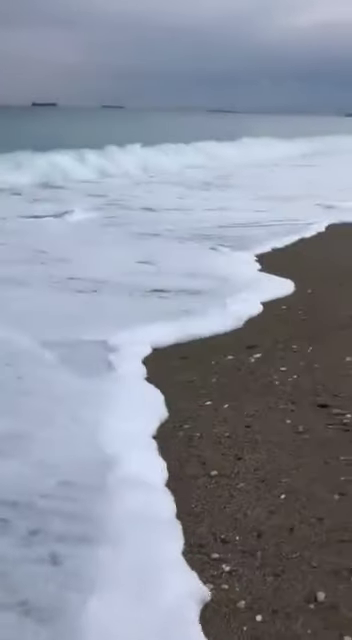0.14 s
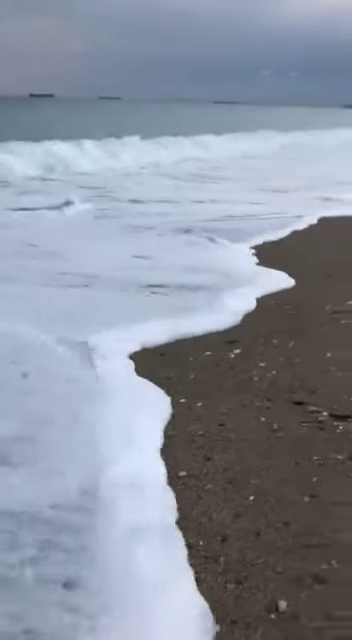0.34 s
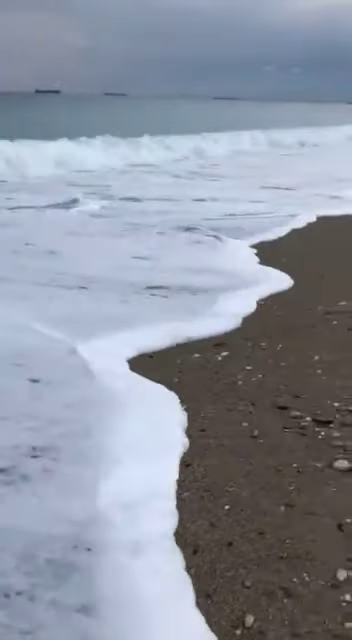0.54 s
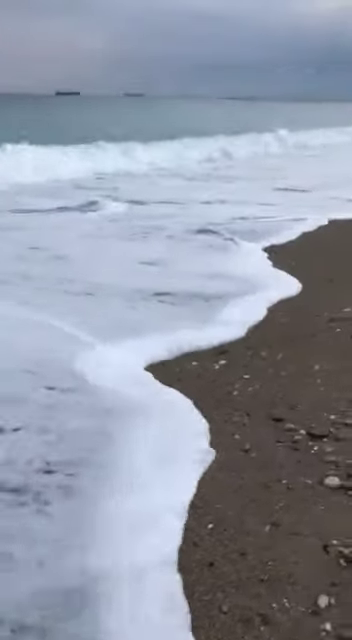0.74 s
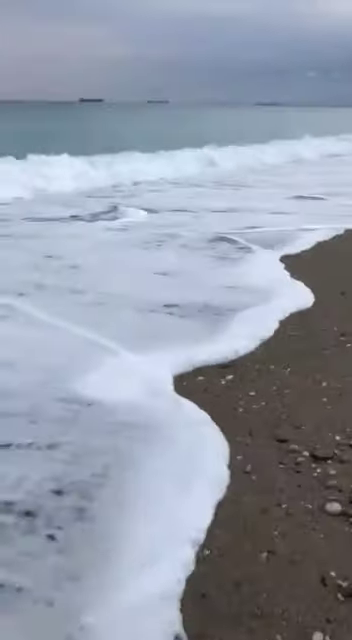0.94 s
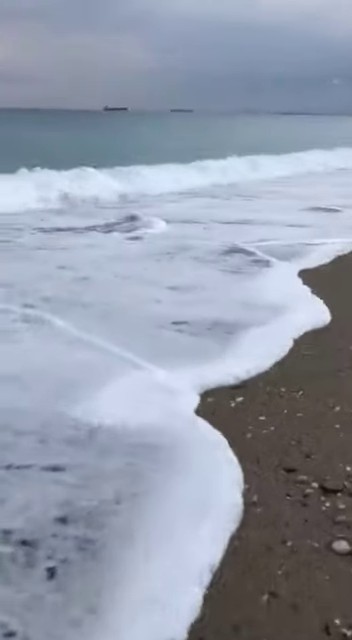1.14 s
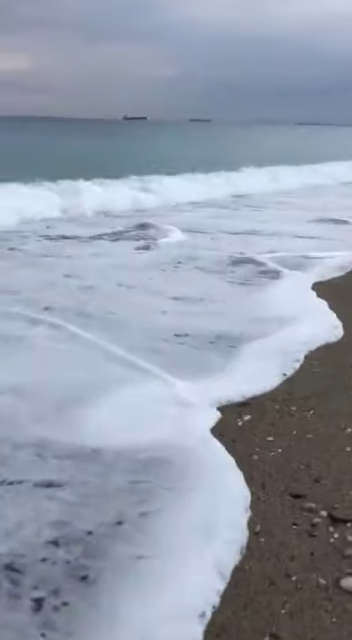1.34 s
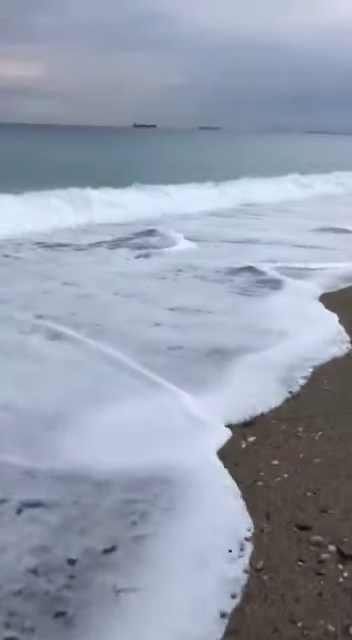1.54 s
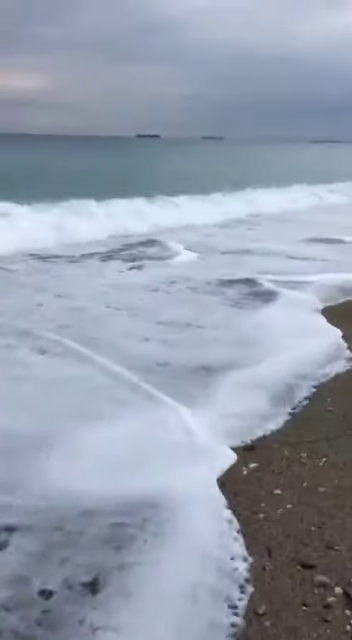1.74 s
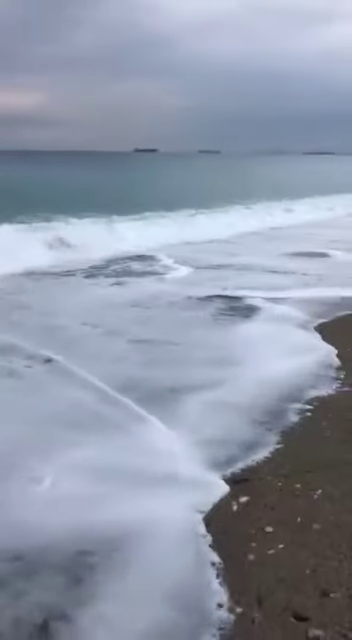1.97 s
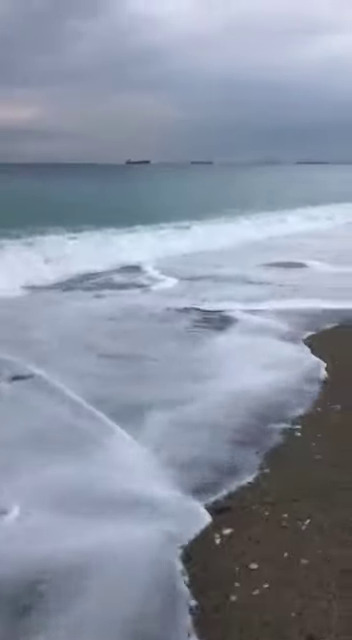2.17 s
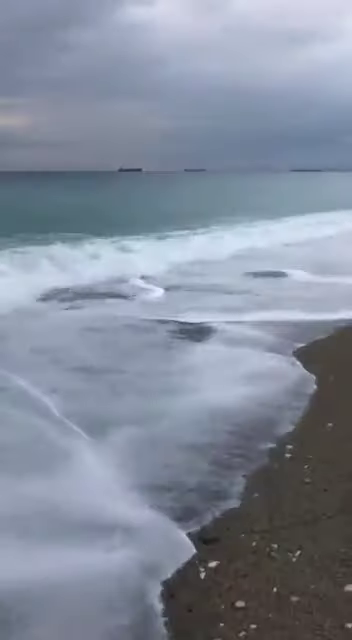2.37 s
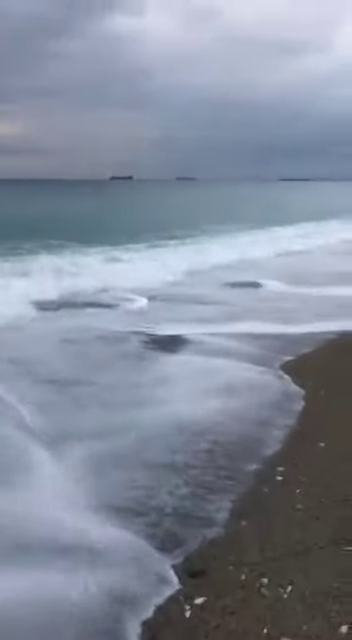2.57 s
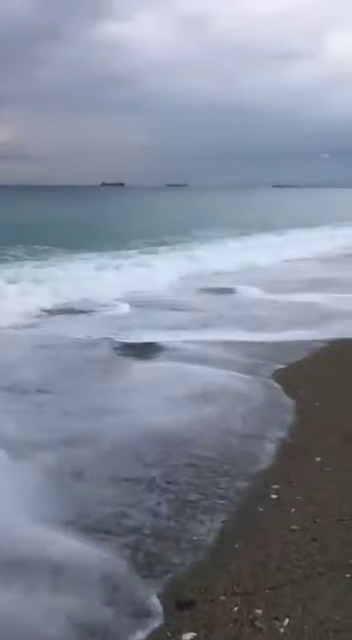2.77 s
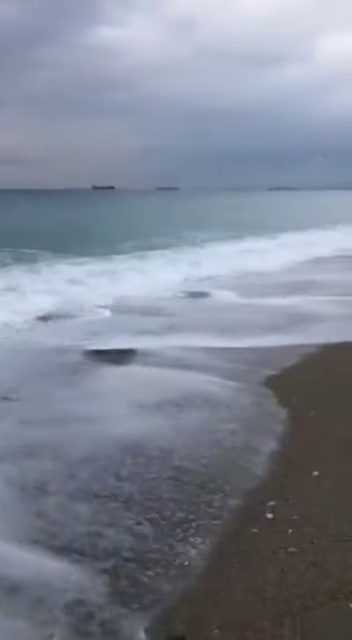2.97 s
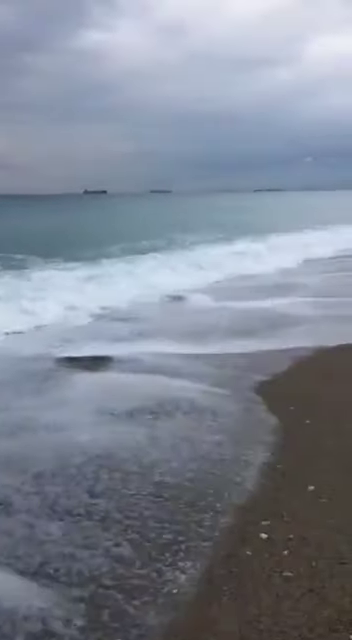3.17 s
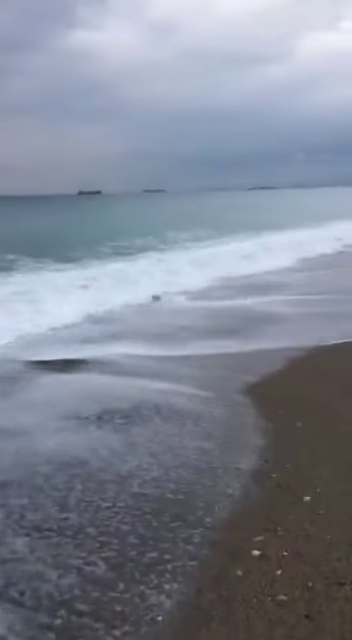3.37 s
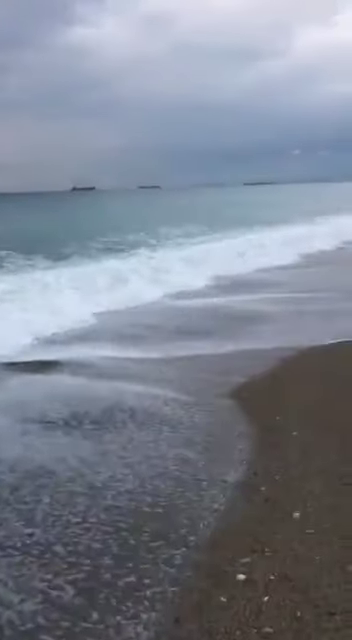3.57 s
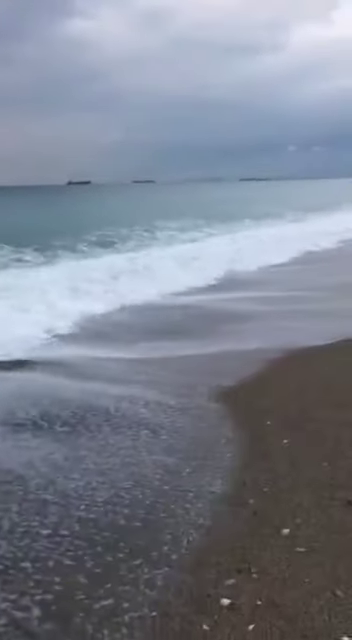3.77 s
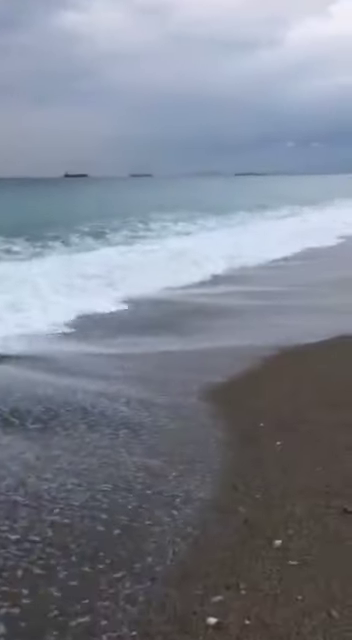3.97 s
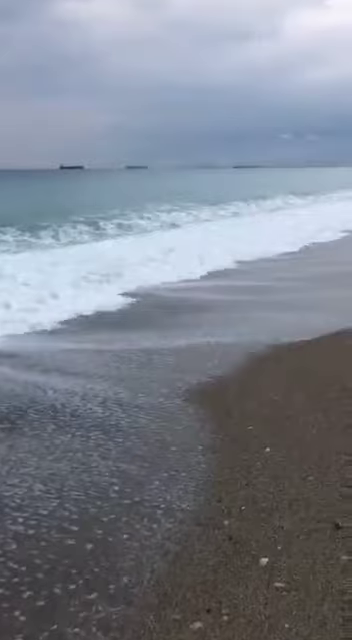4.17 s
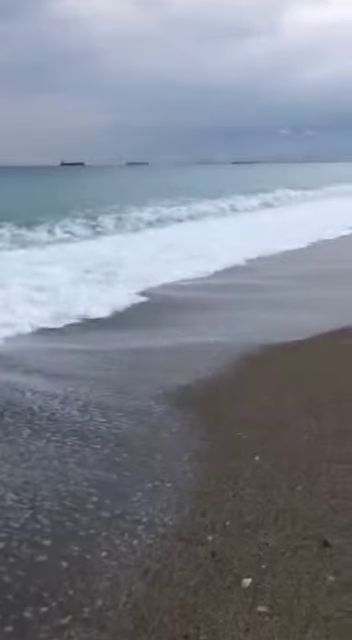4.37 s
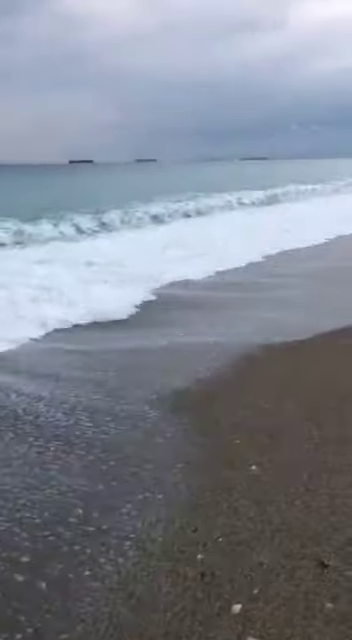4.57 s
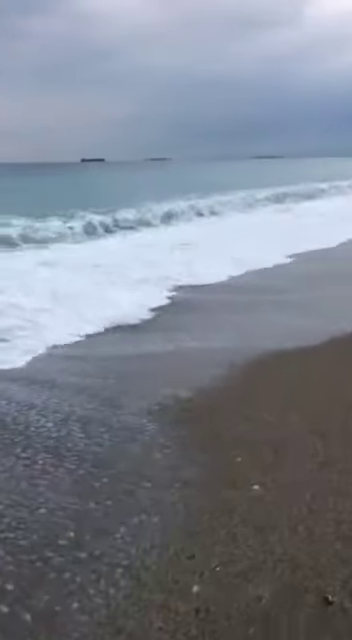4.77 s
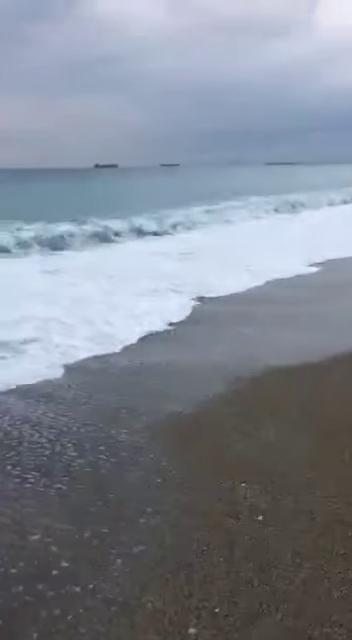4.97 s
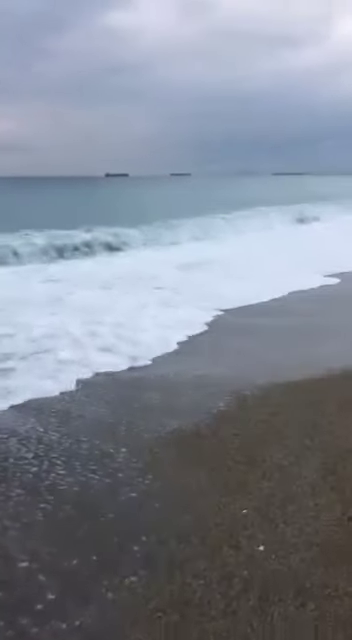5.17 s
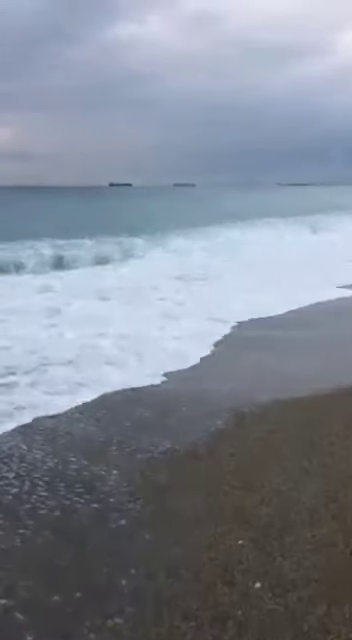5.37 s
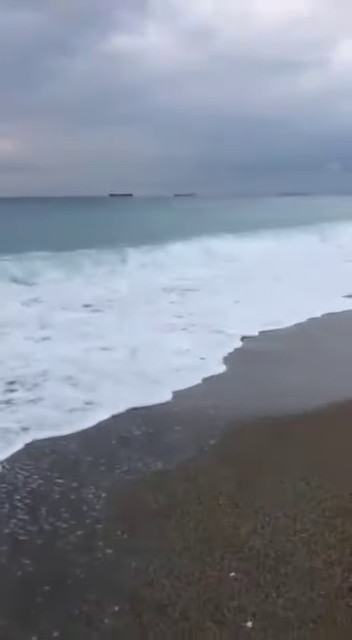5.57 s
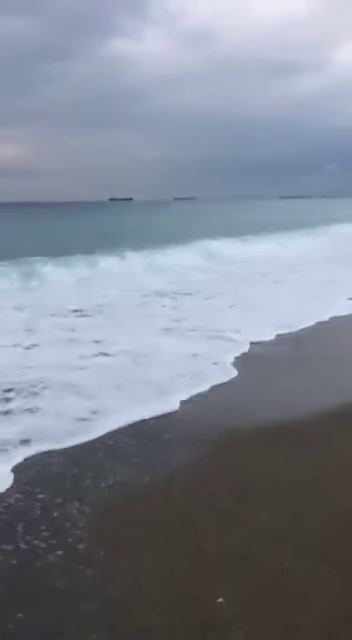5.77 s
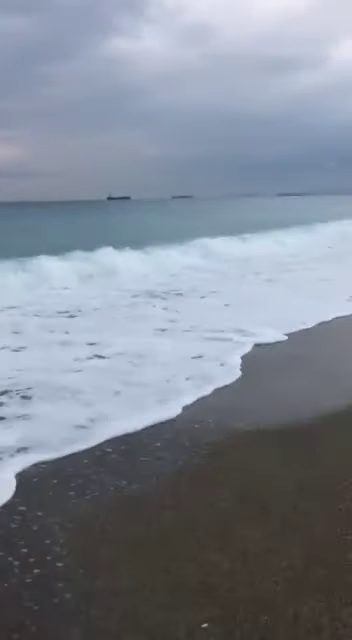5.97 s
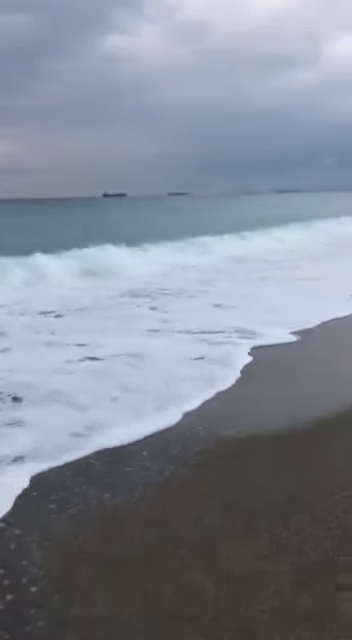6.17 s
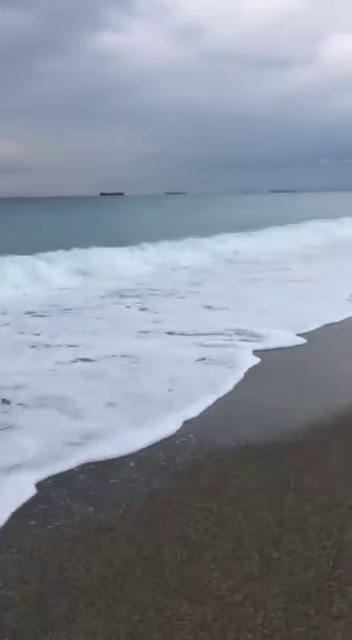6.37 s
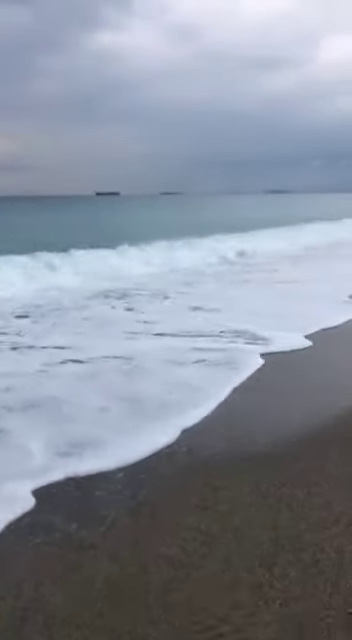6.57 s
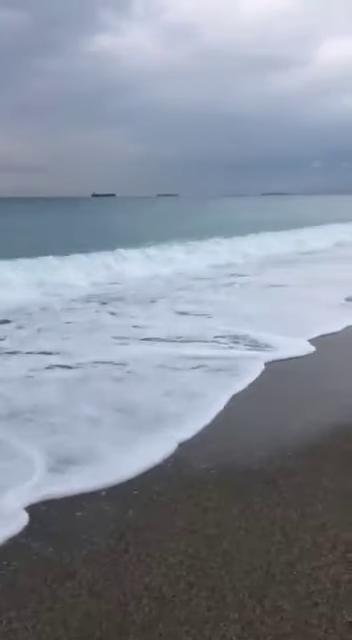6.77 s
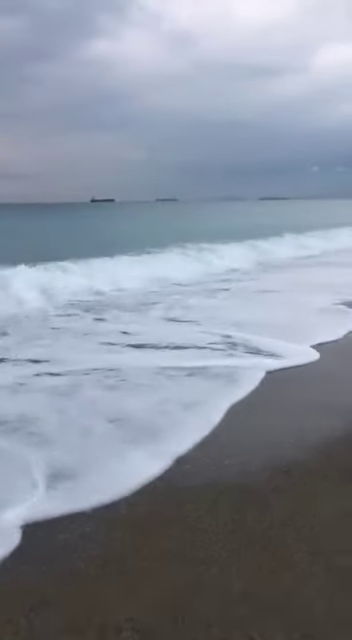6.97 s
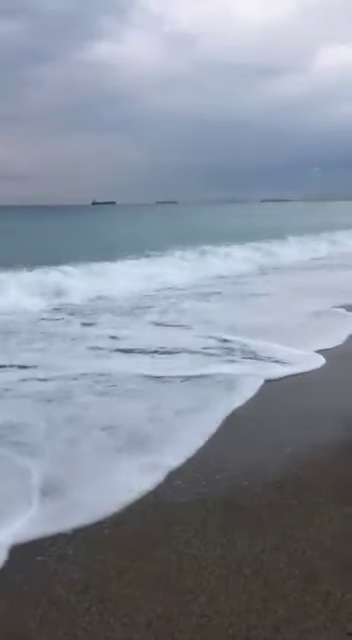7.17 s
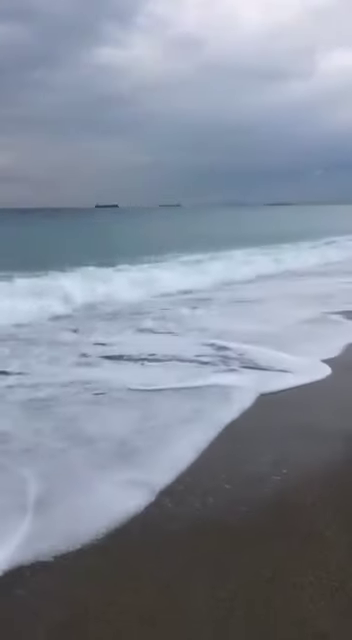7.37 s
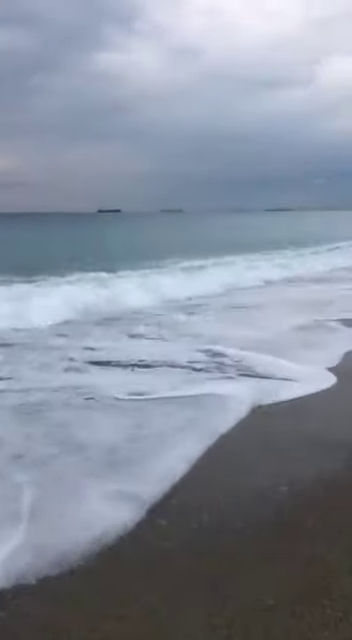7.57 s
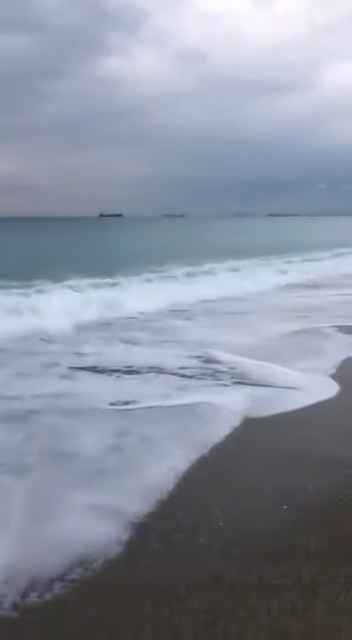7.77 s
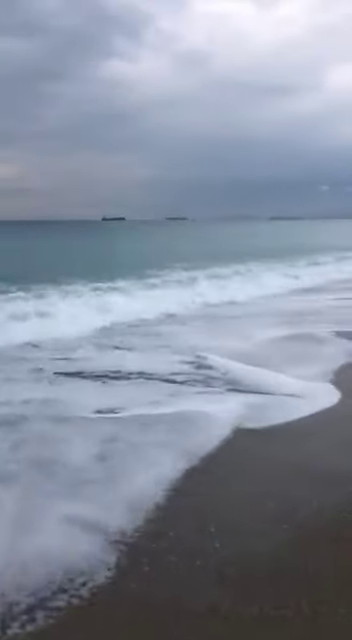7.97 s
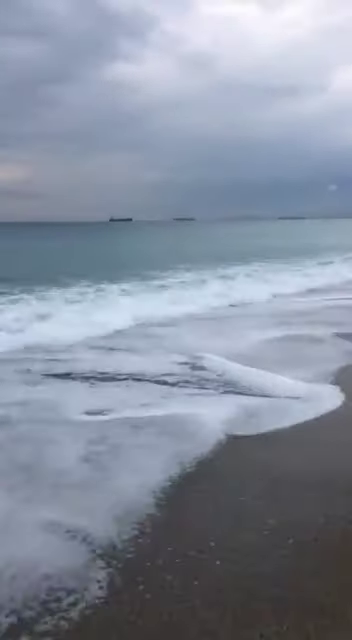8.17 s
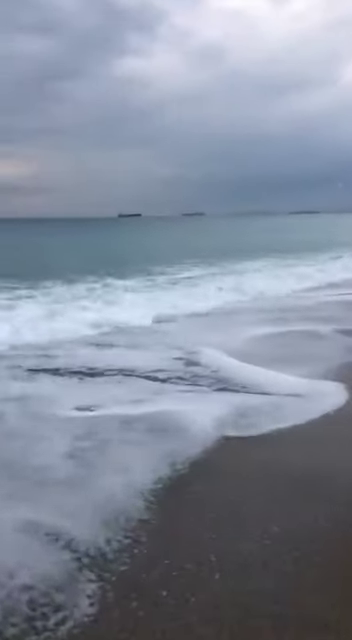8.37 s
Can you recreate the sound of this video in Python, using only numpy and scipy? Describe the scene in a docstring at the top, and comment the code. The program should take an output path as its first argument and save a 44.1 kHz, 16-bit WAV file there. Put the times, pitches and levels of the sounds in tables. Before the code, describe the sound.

Close on an open sandy beach, a wave is already running up, its low pulsing roar and churn under bright hissing foam. A droplet slap and deep thump stand out near the start. It fades to fizz and gurgling backwash, then small thumps lead into a second wave that swells and keeps rushing. Dry, centred, with the very highest treble softened.

```python
"""Two sea waves break and run up a beach of coarse sand, close to the listener.
The first is already running up the sand. Clouds of trapped air roar and churn as pulsing low noise.
The foam front hisses, sizzles and sprays up the sand: bright noise mixed with single ringing bubbles.
Shallow water gurgles in the same way lower down, and bubbles again as it drains back.
A few low thumps of slammed air pockets and two short slaps of droplets stand out."""
import sys
import numpy as np
from scipy import signal
from scipy.io import wavfile
from scipy.ndimage import uniform_filter1d

SR = 44100
rng = np.random.default_rng(int(sys.argv[2]) if len(sys.argv) > 2 else 0)


def master_out(mix):
    """Clip the mix to full scale and print it as 16-bit PCM to the path in sys.argv[1]."""
    frames = np.transpose(np.atleast_2d(mix))
    ceiling = np.clip(frames, -1, 1)
    pcm = np.round(ceiling * 32767).astype(np.int16)
    wavfile.write(sys.argv[1], SR, pcm)


N = 371322  # length of the scene in samples
TIME = np.arange(N) / SR  # seconds

# colour of the shallow water noise: (frequency [Hz], relative level [dB per Hz])
SHALLOW_COLOUR = [(400, 8.5), (700, 1.5), (980, -2), (1250, -5.5), (1900, -9.5), (2600, -12), (3300, -10.5),
                  (4100, -11), (5400, -13.5), (7500, -15), (11200, -15), (13000, -23.5)]


def gain_of(db):
    """Turns decibels into amplitude."""
    return 10 ** (np.asarray(db) / 20)


def evened(x):
    """Scales a signal to an average strength (rms) of 1."""
    return x / np.sqrt(np.mean(x ** 2) + 1e-20)


def read(points, hz):
    """Reads a colour table, joined by straight lines over log frequency."""
    table_hz, level_db = np.transpose(points)
    return np.interp(np.log(hz + 1), np.log(table_hz + 1), level_db)


def drift(shape, size):
    """Chance that varies smoothly over time frames and frequencies, rms 1."""
    field = rng.standard_normal(shape)
    for axis, span in enumerate(size):
        field = uniform_filter1d(field, span, axis, mode="wrap")
    return evened(field)


def rush(colour, low_hz, high_hz, patchy_db, flicker_db, size=1024, order=8):
    """Countless bubbles of one range of sizes merge into noise that comes in uneven clumps."""
    hop = size // 4
    hz = np.fft.rfftfreq(size, 1 / SR) + 1  # the 1 avoids dividing by zero
    shape = (N // hop + 5, len(hz))
    low_side = 1 + (low_hz / hz) ** order
    high_side = 1 + (hz / high_hz) ** order
    band = (low_side * high_side) ** -0.5
    # patches differ between frequencies, flicker moves them all together
    patches = patchy_db * drift(shape, size=(12, 9))
    flicker = flicker_db * drift((shape[0], 1), size=(6, 1))
    noise = rng.standard_normal(shape) + 1j * rng.standard_normal(shape)
    spectrum = noise * band * gain_of(read(colour, hz) + patches + flicker)
    _, sound = signal.istft(spectrum.T, nperseg=size, noverlap=size - hop)
    return evened(sound[:N])


def bubbles(colour, low_hz, high_hz, per_s, cycles, rise, spread_db, count=28):
    """Single near bubbles: each rings for a few cycles and rises in pitch as it nears the surface."""
    out = np.zeros(N)
    slots = N // 16  # most bubbles that can be born at one pitch
    for hz in np.geomspace(low_hz, high_hz, count):
        # age 1 is when the ring has died to about a third, after the given number of cycles
        age = np.arange(int(5 * cycles * SR / hz) + 2) * hz / SR / cycles
        tone = np.sin(2 * np.pi * cycles * (age + rise * age ** 2 / 2))
        ring = tone * np.exp(-age) * (1 - np.exp(-10 * age))
        born, size_draw, place = rng.random((3, slots))
        live = born < per_s * N / SR / count / slots
        # many small bubbles, few loud ones
        size = gain_of(spread_db * np.minimum(-np.log(size_draw + 1e-9), 4))
        clicks = np.bincount((place[live] * N).astype(int), size[live], N)
        rings = evened(signal.oaconvolve(clicks, ring)[:N])
        # higher pitches stand further apart, so each carries a wider share of the colour
        out += gain_of(read(colour, hz)) * np.sqrt(hz) * rings
    return evened(out)


def blend(far, near, near_db):
    """Lets a share of single bubbles stand out of the merged noise."""
    return evened(far + gain_of(near_db) * near)


def swell(s, width):
    """Power that rises and falls smoothly around a moment."""
    return np.exp(-2 * ((TIME - s) / width) ** 2)


def surf(layer, backwash_db, far_db, bursts):
    """Gain of one layer: every wave rises, holds, fades and runs back, over short bursts and the far shore."""
    # the waves: (time of breaking [s], strength [dB])
    waves = [(-1.41, 1.74), (5, 0.0)]
    rise_power = 1.46  # power grows as this power of the time since the layer began
    # the water runs back fastest this long after the break
    backwash_age_s, backwash_width_s = 5.17, 0.77
    db, delay, rise, hold, fade = layer
    power = gain_of(far_db) ** 2
    for s, width, burst_db in bursts:
        power = power + gain_of(burst_db) ** 2 * swell(s, width)
    for start, strength_db in waves:
        age = TIME - start
        growth = np.clip((age - delay) / rise, 0, 1) ** rise_power
        run_up = growth * gain_of(db - fade * np.maximum(age - hold, 0)) ** 2
        run_back = gain_of(backwash_db) ** 2 * swell(start + backwash_age_s, backwash_width_s)
        power = power + gain_of(strength_db) ** 2 * (run_up + run_back)
    return np.sqrt(power)


def crashes(offset_db):
    """The foam front crashing onto the sand, at its level in one layer."""
    # (time [s], half length [s], level in the hiss [dB])
    crash_table = [(0.847, 0.21, -44), (6.0, 0.23, -41.5), (6.8, .2, -47.5)]
    return [(s, width, db + offset_db) for s, width, db in crash_table]


def breaker():
    """Clouds of air pulse under the falling crest: large ones roar, small ones churn."""
    # colour of the deep water noise: (frequency [Hz], relative level [dB per Hz])
    deep_colour = [(20, -48), (30, -36), (42, -19), (65, -5), (95, -3.5), (120, -2.5), (150, -0.5),
                   (195, 0.5), (300, -3.5), (450, -6.5), (560, -8.5), (720, -15.5), (1100, -15.5)]
    # heavy parts of the crest tumbling over: (time [s], half length [s], roar [dB], churn [dB])
    surges = [(0.24, 0.14, -32, -28.5), (0.686, 0.12, -35, -29.5), (1.16, 0.29, -30, -32.5),
              (2.6, .16, -33, -46), (5.33, 0.25, -38.5, -41), (6.473, .24, -33, -36),
              (7.466, .34, -30.5, -32)]
    # how each layer follows a wave of strength 0 dB:
    # (level [dB], delay [s], rise [s], age when fading starts [s], fade [dB per s])
    roar_course = (-29, 0.16, 1, 3.5, 9)
    churn_course = (-31.5, 0.02, 1.06, 4, 7)
    roar_bursts = [(s, width, db) for s, width, db, _ in surges]
    churn_bursts = [(s, width, db) for s, width, _, db in surges]
    roar = surf(roar_course, backwash_db=-42.7, far_db=-43.0, bursts=roar_bursts)
    churn = surf(churn_course, backwash_db=-40.5, far_db=-58, bursts=churn_bursts)
    large = rush(deep_colour, 34, 278, patchy_db=0.1, flicker_db=0.5, size=4096)
    small = rush(deep_colour, 282, 683, patchy_db=0.95, flicker_db=1.03, size=2048)
    return roar * large + churn * small


def wash():
    """Shallow water tumbles over the sand and gurgles: merged noise with single bubbles in it."""
    # (level [dB], delay [s], rise [s], age when fading starts [s], fade [dB per s])
    flow_course = (-37.5, 0.3, 2, 3.5, 4.8)
    flow = surf(flow_course, backwash_db=-43.5, far_db=-50.5, bursts=crashes(-4))
    far = rush(SHALLOW_COLOUR, 690, 1710, patchy_db=0.7, flicker_db=0.7, order=6)
    near = bubbles(SHALLOW_COLOUR, 697, 1790, per_s=800, cycles=5.5, rise=0.013, spread_db=2.5)
    return flow * blend(far, near, near_db=-9)


def foam_hiss():
    """The foam front hisses as merged noise and fizzes as small single bubbles."""
    # (level [dB], delay [s], rise [s], age when fading starts [s], fade [dB per s])
    hiss_course = (-39.5, 0.21, 0.8, 2.5, 3.5)
    hiss = surf(hiss_course, backwash_db=-54.5, far_db=-50.0, bursts=crashes(0))
    far = rush(SHALLOW_COLOUR, 1640, 4900, patchy_db=0.58, flicker_db=0.6, order=6)
    fizz = bubbles(SHALLOW_COLOUR, 1790, 5174, per_s=1800, cycles=10.3, rise=0.01, spread_db=5.0)
    return hiss * blend(far, fizz, near_db=-10.0)


def foam_spray():
    """The smallest bubbles burst as spray: the brightest noise, with short pops in it."""
    # (level [dB], delay [s], rise [s], age when fading starts [s], fade [dB per s])
    spray_course = (-42, 0.17, 0.57, 2.5, 2.5)
    spray = surf(spray_course, backwash_db=-62, far_db=-54, bursts=crashes(0.5))
    far = rush(SHALLOW_COLOUR, 5620, 13600, patchy_db=0.95, flicker_db=0.37)
    pops = bubbles(SHALLOW_COLOUR, 5860, 10600, per_s=3900, cycles=3.9, rise=0.02, spread_db=3.0)
    return spray * blend(far, pops, near_db=-11)


def foam_sizzle():
    """Fresh foam sizzles brightly, as patchy noise that fades soon after the break."""
    # (level [dB], delay [s], rise [s], age when fading starts [s], fade [dB per s])
    sizzle_course = (-46, 0.18, 0.7, 1.0, 4.5)
    sizzle = surf(sizzle_course, backwash_db=-66, far_db=-57, bursts=crashes(-3))
    return sizzle * rush(SHALLOW_COLOUR, 3800, 6000, patchy_db=2.0, flicker_db=1.0)


def splashes():
    """The edge of the water folds over and throws a short burst of droplets."""
    # slaps of the foam edge on the sand: (time [s], level [dB], centre [Hz], half length [s])
    slaps = [(0.765, -42, 5500, 0.04), (4.535, -47, 2600, .035)]
    out = np.zeros(N)
    for s, db, hz, length in slaps:
        droplets = rush(SHALLOW_COLOUR, hz / 2, hz * 2, patchy_db=4.0, flicker_db=5.0)
        out += gain_of(db) * np.exp(-((TIME - s) / length) ** 2) * droplets
    return out


def thumps():
    """An air pocket slammed shut under the breaker gives a few low swings as it collapses."""
    # (time [s], peak level [dB], pitch [Hz], half length [s])
    air_pockets = [(1.227, -22, 110, 0.028), (4.197, -42, 190, 0.0099), (4.412, -38, 180, 0.013),
                   (4.504, -31, 210, 0.0068)]
    out = np.zeros(N)
    for s, db, hz, length in air_pockets:
        swings = np.sin(2 * np.pi * (hz * TIME + rng.random()))
        out += gain_of(db) * np.exp(-((TIME - s) / length) ** 2) * swings
    return out


def scene():
    """Open air, no echo; the same in both ears."""
    foam = foam_hiss() + foam_spray() + foam_sizzle()
    sea = breaker() + wash() + foam + splashes() + thumps()
    return np.array([sea, sea])


def record(dry):
    """The recorder's band limit: a steep filter removes the highest treble."""
    edge_hz = 11880
    low_pass = signal.firwin(401, edge_hz, window=("kaiser", 9), fs=SR)
    return signal.oaconvolve(dry, low_pass[None], "same")


dry = scene()
out = record(dry)
master_out(out)
```